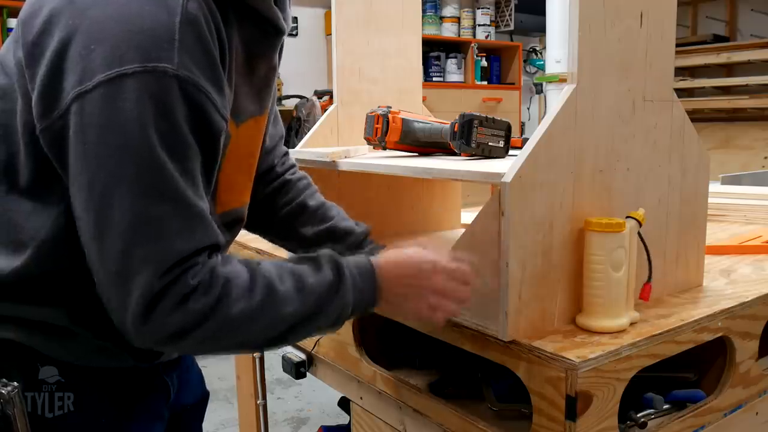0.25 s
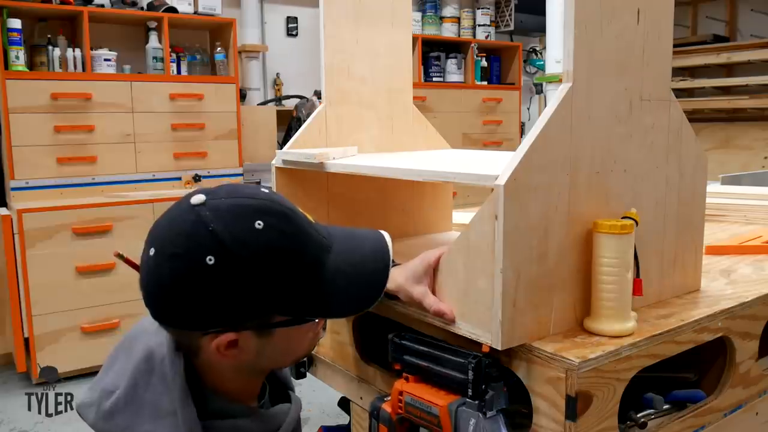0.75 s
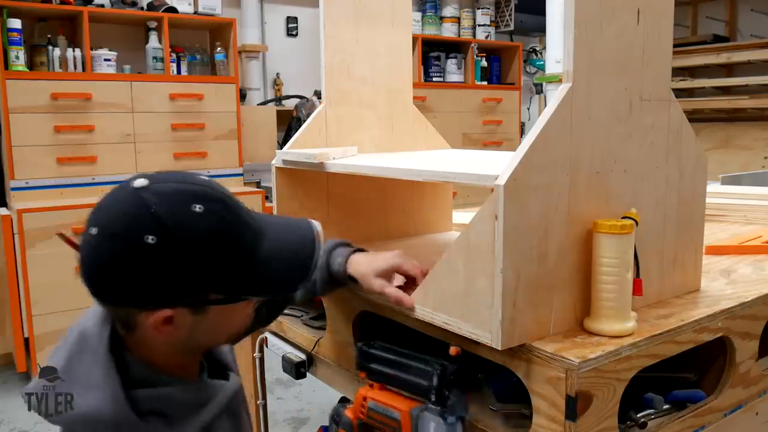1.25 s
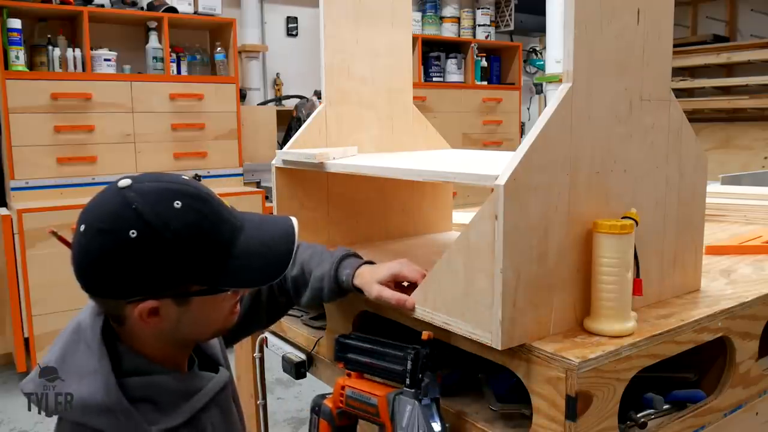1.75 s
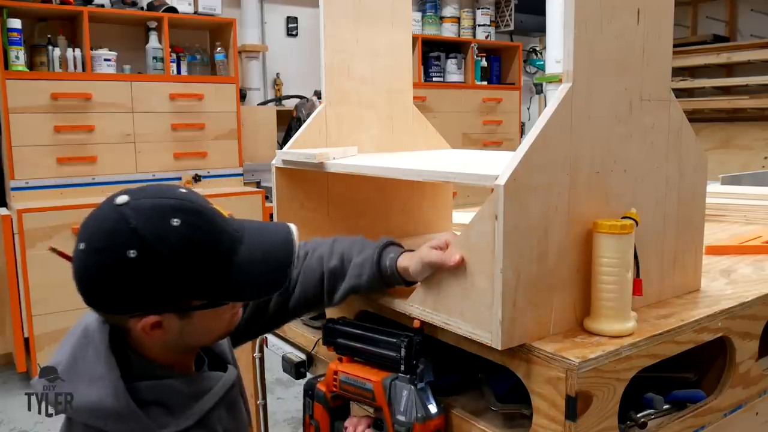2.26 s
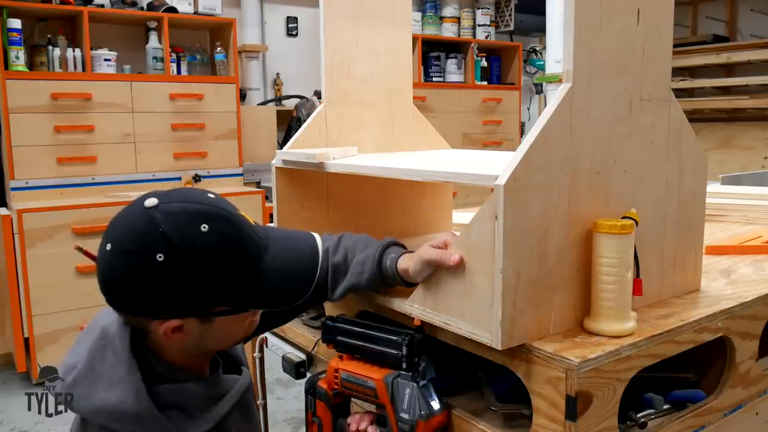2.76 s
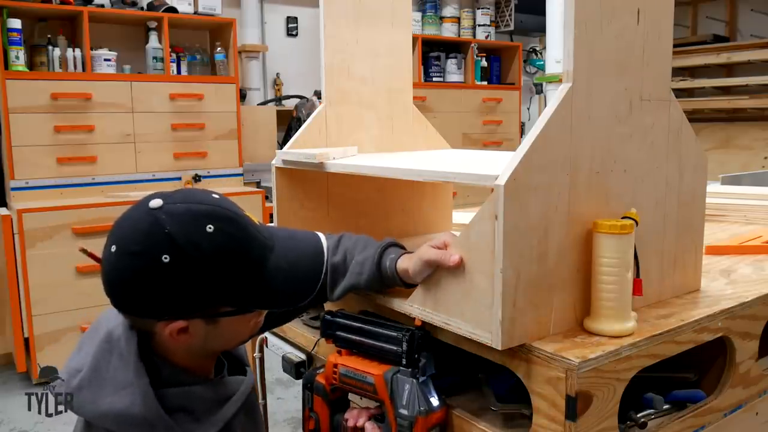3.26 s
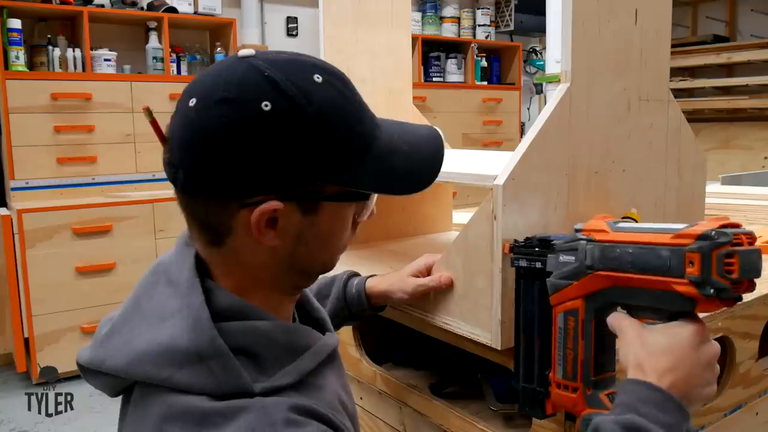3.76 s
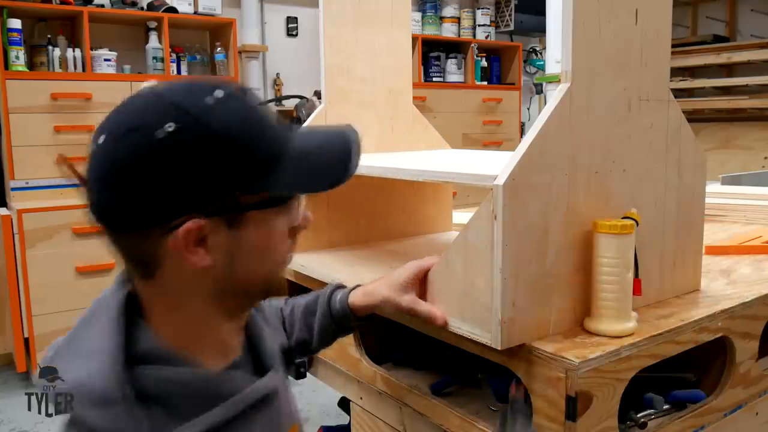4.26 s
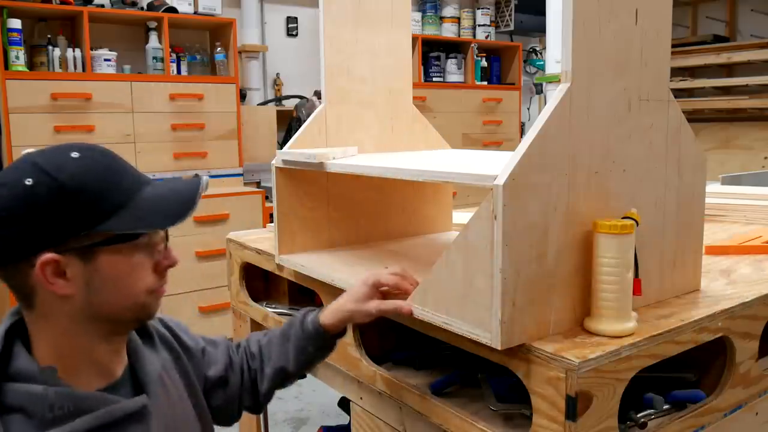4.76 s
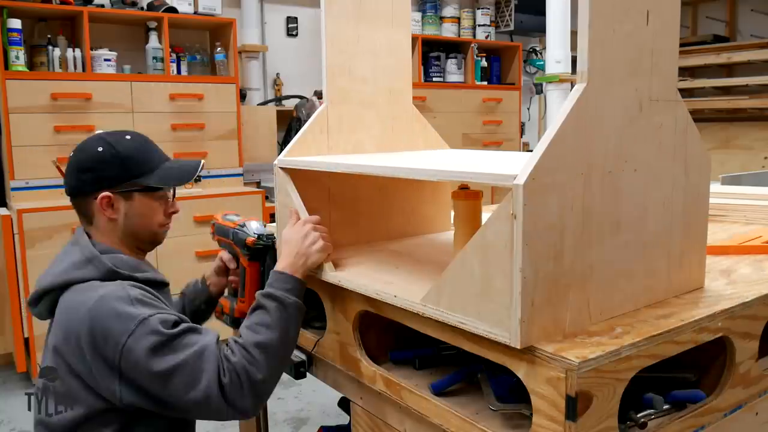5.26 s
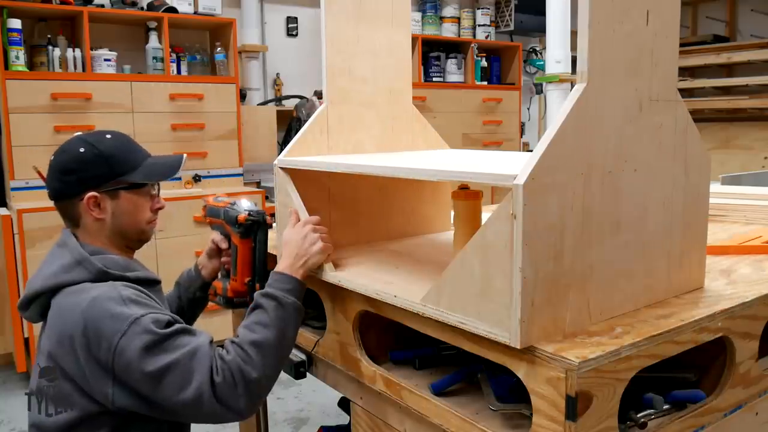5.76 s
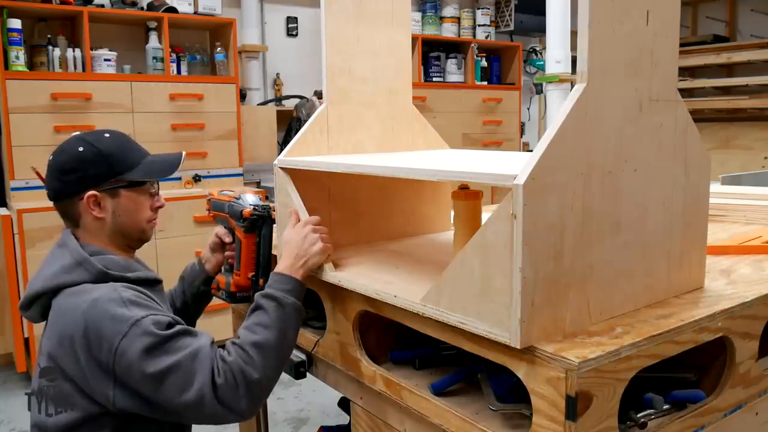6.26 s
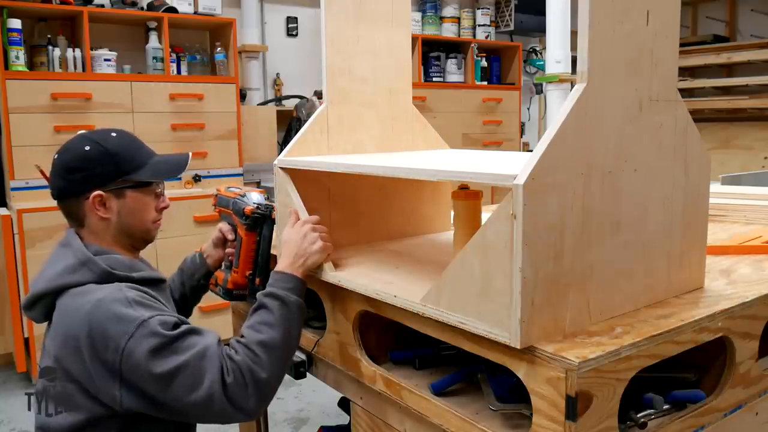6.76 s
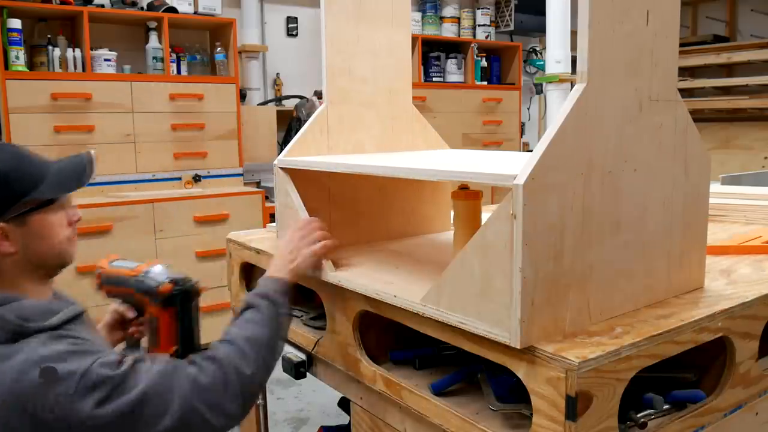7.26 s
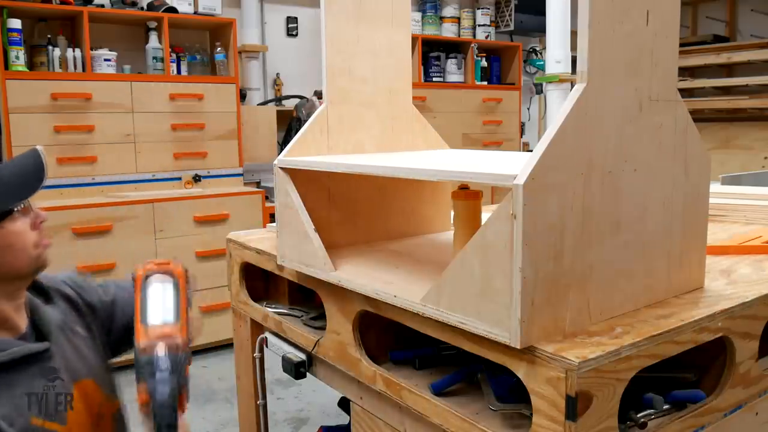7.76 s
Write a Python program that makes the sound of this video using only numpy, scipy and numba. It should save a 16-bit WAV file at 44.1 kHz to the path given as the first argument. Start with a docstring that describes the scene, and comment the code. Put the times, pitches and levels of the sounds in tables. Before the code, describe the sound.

Close by in a quiet workshop, a cordless nailer fires five times into plywood. Every shot starts with a quick, gritty motor whir, cracks with a hollow wooden thump, and ends in a brief mechanical clatter. The second and third shots come close together, the others further apart. Soft cloth rustle, dull bumps, small taps and tiny spring squeaks fill the gaps as the tool is moved, over faint room air.

```python
"""Battery nailer in a workshop

Five nails go into a plywood cabinet. Each time, a geared motor whines as it cocks the piston, the shot
booms through the wood and the room, and latches clack as the motor winds back. A limiter holds the boom
flat. Sleeves rustle and the tool's nose scrapes, taps and squeaks, over a faint hum and room air."""
import sys
import numpy as np
from scipy import signal
from scipy.fft import rfft, irfft
from scipy.io import wavfile
from scipy.ndimage import uniform_filter1d, minimum_filter1d
from numba import njit

SR = 44100
rng = np.random.default_rng(int(sys.argv[2]) if len(sys.argv) > 2 else 0)


def dump_mix(stems):
    """Bounce the given channels to the path in sys.argv[1] as a 16-bit WAV at rate SR."""
    frames = np.atleast_2d(stems).T  # one column per channel
    limited = np.clip(frames, -1, 1)  # hard clip at full scale
    pcm = np.round(limited * 32767).astype(np.int16)
    wavfile.write(sys.argv[1], SR, pcm)


N = 353682
T = np.arange(N) / SR


def undb(db):
    return 10 ** (np.asarray(db) / 20)


def level(x, db=0):
    """Set a sound's average (rms) level."""
    return x * undb(db) / np.sqrt(np.mean(x ** 2))


def colour(x, table):
    """Shape a sound's bass and treble with (frequency [Hz], level [dB]) points."""
    hz, db = np.transpose(table)
    f = np.maximum(np.fft.rfftfreq(x.shape[-1], 1 / SR), 1)
    return irfft(rfft(x) * undb(np.interp(np.log(f), np.log(hz), db)), x.shape[-1])


def wander(rate):
    """Glide to a new random value, roughly 1 in size, `rate` times a second."""
    k = int(SR / rate)
    return 1.4 * uniform_filter1d(np.repeat(rng.standard_normal(N // k + 1), k), k)[:N]


def add(out, s, x):
    """Mix x into out, starting at s seconds."""
    i = int(s * SR)
    out[i:i + len(x)] += x[:max(len(out) - i, 0)]


def fall(t, ring_s):
    """Die away by 60 dB in ring_s seconds: the "ring time" in the tables."""
    return 1000. ** (-t / np.maximum(ring_s, .005))


def burst(hz, ring_s, q, hold_s=0):
    """A puff of noise around one pitch that holds, then dies. Higher q sounds more like a note."""
    t = np.arange(SR // 4) / SR
    b, a = signal.iirpeak(np.clip(hz, 30, 9000), q, SR)
    x = rng.standard_normal(len(t)) * fall(np.maximum(t - hold_s, 0), ring_s) * np.minimum(t / .0015, 1)
    x = signal.lfilter(b, a, signal.lfilter(b, a, x))
    return x / np.abs(x).max()


def knock(hz, treble_db, ring_s, q, hold_s=0):
    """Two hard things meet: a main burst, a higher and a lower one, and a bright tick."""
    main = burst(hz, ring_s, q, hold_s)
    high = burst(1.7 * hz, .7 * ring_s, q, hold_s)
    low = burst(hz / 2.2, min(ring_s, .08), min(q, 2.2), hold_s)
    tick = burst(7500, min(.6 * ring_s, .04), .9, hold_s)
    return main + .4 * high + .4 * low + undb(treble_db) * tick


def stereo(middle, side):
    """Make left and right by adding and subtracting the side signal."""
    return middle + side * np.array([[1], [-1]])


# The tone of the room's air: (frequency [Hz], level [dB])
AIR_TONE = [(12, -41.5), (20, -3.5), (127, -8), (154, -16), (241, -7), (277, -11), (802, -21), (873, -20.5),
            (949, -21.5), (2200, -34.5), (3400, -36), (5500, -45), (12100, -46), (16000, -61)]
def air():
    """Soft, low room noise, nearly alike in both ears."""
    middle, side = colour(rng.standard_normal((2, N)), AIR_TONE)
    noise = stereo(middle, .05 * side + .6 * np.diff(side, prepend=0))
    return level(noise, -62) * undb(1.5 * wander(2.2))


# The notes of the hum: (pitch [Hz], average level [dB])
HUM_NOTES = [(123.8, -68), (861, -80.5)]
def hum(stop_s=5.2):
    """A faint hum that wavers, then stops."""
    notes = sum(np.sqrt(2) * undb(db + .5 * wander(1.3)) * np.sin(2 * np.pi * hz * T)
                for hz, db in HUM_NOTES)
    return notes * np.clip((stop_s - T) / .03, 0, 1)


# Sleeve and hand movements: (loudest at [s], level [dB], rise [s], fade [s], treble [dB])
SLEEVE_SWEEPS = [(0.461, -69, 0.086, 0.065, -19), (1.129, -50.5, 0.38, 0.5, -13),
                 (1.96, -62, 0.045, 0.15, -20.5), (2.13, -64.5, 0.24, 0.51, -10.5),
                 (2.839, -58.5, 0.037, 0.061, -31), (4.23, -45, 0.039, 0.28, -15.5),
                 (4.61, -53.5, 0.15, 0.44, -12), (5.23, -50.5, 0.14, 0.15, -23),
                 (5.88, -49, 0.13, 0.11, -14.5), (6.24, -61, .06, 0.12, -34),
                 (7.13, -50.5, 0.06, 0.41, -16), (7.32, -51.5, 0.047, 0.083, -18),
                 (7.55, -59, 0.032, 0.2, -14), (7.77, -62.5, 0.2, 0.083, -7), (8.02, -56.5, 0.21, .1, -15)]
# The tone of rubbing cloth: (frequency [Hz], level [dB])
CLOTH_TONE = [(88, -46.5), (150, -2), (179, 5.5), (448, 1.5), (854, 0), (3220, -6), (4410, -12.5),
              (14500, -55.5), (16000, -22)]
# The sizzle of fine rubbing, also used for the motor's brushes: (frequency [Hz], level [dB])
SIZZLE_TONE = [(2000, -35), (5000, 4.5), (7000, 1), (11000, -3), (15000, -10), (16500, -28.5)]
def rustle():
    """Cloth rubs in grainy sweeps that rise and fade by 20 dB in the listed times."""
    cloth_gain, sizzle_gain = undb(-101.5), undb(-124.5)  # cloth never quite rests
    for s, db, rise, fade, treble_db in SLEEVE_SWEEPS:
        sweep = undb(db - 20 * np.maximum((s - T) / rise, (T - s) / fade))
        cloth_gain += sweep
        sizzle_gain += undb(treble_db) * sweep
    grains = rng.standard_normal((2, N)) * undb(2 * wander(25) + 1.2 * wander(200))
    cloth = level(colour(grains[0], CLOTH_TONE))
    sizzle = level(colour(grains[1], SIZZLE_TONE))
    return cloth_gain * cloth + sizzle_gain * sizzle


# Clacks of the trigger and the starting motor: (time [s], level [dB], pitch [Hz], ring time [s])
TRIGGER_CLACKS = [(0.549, -38.5, 3700, 0.047), (0.56, -35, 2820, 0.064), (.579, -13, 1880, 0.03),
                  (3.047, -40.5, 3900, 0.12), (3.063, -29, 1330, 0.021), (3.078, -10, 1404, 0.2),
                  (3.699, -23, 1250, 0.047), (3.723, -11.5, 1320, 0.044), (6.57, -23.5, 1490, 0.046),
                  (6.591, -21.5, 1120, 0.035)]
def trigger_clacks():
    """The trigger and motor clack. Higher clacks tick harder; longer ones have a clearer pitch."""
    out = np.zeros(N)
    for s, db, hz, ring_s in TRIGGER_CLACKS:
        treble_db = -26.5 + 14.5 * np.log2(hz / 1000)
        add(out, s, undb(db) * knock(hz, treble_db, ring_s, q=34 * ring_s))
    return out


# One row per nail: (motor start [s], shot [s], brush hiss [dB], cocking [dB], winding back [dB],
# shot level [dB], extra bass [dB], extra blade ring [dB], extra low-middle tones [dB])
NAILS = [(0.577, 0.776, -8.5, -36.5, -37, -13, 4.5, 2, 0.5),
         (3.073, 3.273, -13, -34.5, -27.5, -8.5, 1.5, 1, -1),
         (3.72, 3.918, -15.5, -33, -30, -3, -15, -4.5, 1.5),
         (5.303, 5.447, -18, -36.5, -27.5, -1, -9.5, -5, -4.5),
         (6.567, 6.791, -22.5, -36.5, -24.5, -9.5, -14, -3, 3.5)]
# Each nail's blow; a "lead" is time before the shot: (motor dip lead [s], motor dip [dB], snap [dB],
# hiss and tick [dB], jolt lead [s], jolt [dB], hiss lead [s], shudder [dB],
# plywood ring time [factor], blade ring time [factor])
BLOWS = [(0.0084, -12.5, 2.5, 2.5, 0.009, -9.5, .001, -15, 0.78, 0.82),
         (0.014, -3, 6.5, 3.5, 0.011, -16, .001, -13, 0.87, 0.63),
         (0.015, -22, 6.5, -10, 0.0043, -5, .001, -19, 0.99, 0.56),
         (0.016, -12, 8.5, 3, 0.0052, -4.5, .004, -16, 1, 0.69),
         (0.0036, 0, 8, 0.5, 0.005, -11, 0.0053, -13.5, 0.97, 0.74)]
# Each nail's whine: (five columns of boost for harmonics 1-5 [dB], housing ring [dB], speed [factor])
WHINES = [(4, 1, 3.3, 2, -2.5, -8, 1.01), (3, -5, 2.3, -3.5, 4.5, -15.5, 1.0),
          (0.5, 0.5, 3, -8.5, 3.5, -19, 0.99), (9, -1.5, 6, -5, -3, -7.5, 0.99),
          (-2, -2, 3, -3, 1, -9, 0.99)]
# The gears slow as the load builds towards the shot: (time from the shot [s], base pitch [Hz])
GEAR_PITCH = [(-.21, 1277), (-.14, 1226), (-.07, 1199), (0, 1173), (.1, 1215)]
def motor_drive(run_on_s=.243):
    """The motor's pitch and levels over time: it cocks the piston, lets go, winds back and stops."""
    hz = np.full(N, 1200.)
    gain, load, hiss, housing = np.zeros((4, N))
    boosts_db = np.zeros((len(GEAR_HARMONICS), N))
    for nail, whine, (lead, dip_db, *_) in zip(NAILS, WHINES, BLOWS):
        start, shot, hiss_db, cock_db, back_db, *_ = nail
        *harmonics_db, housing_db, speed = whine
        stop = shot + run_on_s
        on = (T >= start) & (T < stop + .1)
        loudness = [(start, cock_db - 9), (start + .0073, cock_db), (shot - lead - .004, cock_db),
                    (shot - lead, cock_db + dip_db), (shot, cock_db + dip_db),
                    (shot + .0045, back_db), (stop, back_db - 12.5), (stop + .014, -70)]
        gain[on] = undb(np.interp(T[on], *np.transpose(loudness)))
        hz[on] = speed * np.interp(T[on] - shot, *np.transpose(GEAR_PITCH))
        load[on] = np.where(T[on] < shot, 1, .25)
        hiss[on], housing[on] = undb(hiss_db), undb(housing_db)
        boosts_db[:len(harmonics_db), on] = np.array(harmonics_db)[:, None]
    return hz, gain, load, hiss, housing, boosts_db


# The notes that make up the whine: (multiple of the gear pitch [factor], level [dB])
GEAR_HARMONICS = [(1, -19), (2, 3), (3, -11.5), (4, -1.5), (5, -11.5), (6, -12.5), (7, -15.5), (8, -18.5),
                  (9, -23.5)]
# The tone of grinding gears: (frequency [Hz], level [dB])
GRIND_TONE = [(35, -22), (60, -9.5), (156, 5), (448, -6), (946, -1.5), (1140, -0.5), (1220, 4.5),
              (1700, -2.5), (2470, -4.5), (3040, -1.5), (3500, -3.5), (3850, -4.5), (10500, -32),
              (14900, -37), (16000, -47.5)]
def motor(teeth_per_turn=10.4, housing_hz=3468, housing_width_hz=140):
    """Gears whine and grind and brushes hiss, throbbing once a turn. Tooth ticks ring the housing."""
    hz, gain, load, hiss, housing, boosts_db = motor_drive()
    phase = 2 * np.pi * np.cumsum(hz * (1 + .007 * wander(200))) / SR
    turn = np.sin(phase / teeth_per_turn)
    notes = sum(undb(db + boost_db + 3.5 * wander(200)) * np.sin(k * phase)
                for (k, db), boost_db in zip(GEAR_HARMONICS, boosts_db))
    whine = undb(-9.5) * notes * (1 + .4 * turn)
    throb = 1 + .18 * turn
    grit = undb(1.5 * wander(600))
    grind = colour(rng.standard_normal(N) * grit, GRIND_TONE) * throb
    # one tick of random strength each time two teeth meet
    teeth = np.diff(phase // (2 * np.pi), prepend=0) * undb(5.5 * rng.standard_normal(N))
    brushes = colour(rng.standard_normal(N) * grit + level(teeth, -12), SIZZLE_TONE) * throb
    resonance = signal.iirpeak(housing_hz, housing_hz / housing_width_hz, SR)
    ring = signal.lfilter(*resonance, teeth * rng.standard_normal(N))
    return gain * (level(grind) + housing * level(ring) + load * whine + hiss * level(brushes))


def bench_jolts():
    """A jolt runs through the bench just ahead of each shot: a dip, then a slower swing back."""
    out = np.zeros(N)
    for (_, s, _, _, _, db, *_), (_, _, _, _, lead, jolt_db, *_) in zip(NAILS, BLOWS):
        add(out, s - lead, -undb(db + jolt_db) * np.hanning(int(.0039 * SR)))
        add(out, s - lead + .0027, undb(db + jolt_db - 2.5) * np.hanning(int(.0091 * SR)))
    return out


def nose_snaps():
    """The release hisses, then the tool's nose ticks and snaps, chattering for a moment."""
    out = np.zeros(N)
    for (_, s, _, _, _, db, *_), (_, _, snap_db, tick_db, _, _, lead, *_) in zip(NAILS, BLOWS):
        add(out, s - lead, undb(db + tick_db - 7) * burst(4100, ring_s=.08, q=.5))
        add(out, s - .001, undb(db + tick_db - 7.5) * burst(7000, ring_s=.035, q=.34, hold_s=.008))
        add(out, s - .001, undb(db + snap_db) * burst(1200, ring_s=.031, q=.4, hold_s=.008))
    return out


def low_boost(hz, bass_db, mid_db):
    """Pick the extra level for a bass or low-middle pitch."""
    return bass_db if hz < 450 else mid_db if hz < 950 else 0


# The cabinet's natural notes: (pitch [Hz], level [dB], ring time [s])
PLYWOOD_NOTES = [(90, -11.5, 0.17), (153.7, -22, 0.9), (210, 1, 0.079), (300.5, -6, 0.25),
                 (379, -10.5, 0.4), (551, 1.5, 0.055), (603, -7.5, 0.14), (728, 0, 0.064), (906, 3, 0.027),
                 (1038, 0, 0.018), (1290, -10, 0.16), (1490, -12.5, 0.43), (2400, -18.5, 0.078),
                 (3080, -13.5, 0.074)]
def plywood_ring(t, stretch, bass_db, mid_db):
    """Struck plywood rings at many pitches at once, a little differently on each blow."""
    ring = 0
    for hz, db, ring_s in PLYWOOD_NOTES:
        gain = undb(db + 2 * rng.standard_normal() + low_boost(hz, bass_db, mid_db))
        pitch = hz * (1 + .023 * rng.standard_normal())
        ring += gain * np.sin(2 * np.pi * pitch * t) * fall(t, ring_s * stretch)
    return ring * np.minimum(t / .0021, 1)


# The notes of the steel blade that drives the nail: (pitch [Hz], ring time [s])
BLADE_NOTES = [(1940, 0.082), (2010, 0.1)]
def blade_ring(t, stretch):
    """The blade rings and rattles in its guide, so its level and pitch wobble."""
    ring = 0
    for hz, ring_s in BLADE_NOTES:
        gain = undb(4.5 * wander(150)[:len(t)]) * fall(t, ring_s * stretch)
        pitch = hz * (1 + .012 * wander(214)[:len(t)])
        ring += gain * np.sin(2 * np.pi * np.cumsum(pitch) / SR)
    return ring


# The tone of the shot's crack: (frequency [Hz], level [dB])
CRACK_TONE = [(47, -37), (80, 1), (493, 2), (538, 1), (1000, -4), (1990, -6.5), (2330, -15), (3470, -16.5),
              (9400, -45.5), (16000, -63)]
def shots():
    """Each blow cracks through the air and rings wood and blade; the winding motor shakes the wood."""
    out, t = np.zeros(N), np.arange(SR // 2) / SR
    shudder = np.interp(t, [.02, .04, .105, .115], [0, 1, 1, 0])
    for nail, (*_, shudder_db, wood_stretch, blade_stretch) in zip(NAILS, BLOWS):
        _, s, _, _, _, db, bass_db, blade_db, mid_db = nail
        ring = plywood_ring(t, wood_stretch, bass_db, mid_db)
        ring += undb(blade_db + 1.5) * blade_ring(t, blade_stretch)
        tone = [(hz, tone_db + low_boost(hz, bass_db, mid_db)) for hz, tone_db in CRACK_TONE]
        noise = level(colour(rng.standard_normal(len(t)), tone), 1)
        crack = noise * (fall(t, .057) + undb(shudder_db) * shudder)
        add(out, s, undb(db) * (undb(-4.5) * ring + crack))
    return out


# Clacks after each shot: (time [s], level [dB], pitch [Hz], treble [dB], ring time [s])
LATCH_CLACKS = [(0.809, -31, 1100, -15, 0.027), (.9055, -12.5, 3040, -8.5, 0.047),
                (0.961, -15, 1510, -15.5, 0.054), (1.0, -15.5, 2210, -20, 0.06),
                (3.331, -19, 1880, -23, 0.076), (3.3677, -10.5, 1997, -25, 0.048),
                (3.403, -14, 2830, -8, 0.071), (3.459, -18, 1540, -14.5, 0.075),
                (3.4967, -20, 2800, -19, 0.055), (3.9487, -28, 1320, -16, .04),
                (4.0547, -10.5, 2560, -11.5, 0.02), (4.068, -24, 1490, -12, 0.033),
                (4.1075, -21, 2370, -16, 0.04), (4.146, -11, 1970, -23, 0.064),
                (5.5086, -10, 1180, -18, 0.058), (5.586, -10.5, 3830, -15, 0.033),
                (5.638, -17, 2240, -15, 0.046), (5.6789, -18, 2540, -16.5, 0.032),
                (5.732, -35.5, 1480, -17, 0.037), (6.8257, -11.5, 2150, -22, 0.052),
                (6.9225, -16, 3527, -16, 0.043), (6.9464, -23, 2000, -22, 0.055),
                (6.985, -21, 1745, -16, 0.037), (7.0196, -23, 1980, -16.5, 0.063)]
def latches():
    """The piston bounces, then latches catch and chatter as it winds back."""
    out = np.zeros(N)
    for s, db, hz, treble_db, ring_s in LATCH_CLACKS:
        add(out, s, undb(db) * knock(hz, treble_db, ring_s, q=2.2, hold_s=.13 * ring_s))
    return out


# Ticks of a loose part: (time [s], level [dB], pitch [Hz])
LOOSE_TICKS = [(1.1515, -30, 2220), (1.1559, -30.5, 2280)]
def loose_part():
    """A loose part of the tool ticks twice."""
    out = np.zeros(N)
    for s, db, hz in LOOSE_TICKS:
        add(out, s, undb(db) * burst(hz, ring_s=.013, q=2))
    return out


# Short slides of the nose: (time [s], length [s], level [dB], pitch [Hz])
NOSE_SCRAPES = [(1.168, 0.072, -48.5, 3260), (1.299, 0.032, -49, 2980), (1.298, .04, -53, 1880),
                (1.44, 0.037, -56.5, 3070)]
def scrapes():
    """The nose scrapes over the plywood in short, held bursts of noise."""
    out = np.zeros(N)
    for s, length, db, hz in NOSE_SCRAPES:
        add(out, s, undb(db) * burst(hz, ring_s=.068, q=3.5, hold_s=length))
    return out


# Light taps on the wood: (time [s], level [dB], pitch [Hz], treble [dB])
WOOD_TAPS = [(1.943, -66, 955, 5), (2.817, -49.5, 1010, -18), (2.975, -28, 1550, -36),
             (3.665, -45, 1150, -13), (4.341, -41.5, 1370, -9), (4.997, -53, 1315, -54),
             (5.876, -42.5, 1060, -25), (5.898, -42, 1030, -20), (6.169, -41, 1350, -28),
             (6.172, -50, 3200, -25), (2.996, -46.5, 4500, 0), (7.523, -40, 3300, -17),
             (6.211, -44.5, 1286, -33), (7.29, -43, 1410, -29), (7.317, -39, 1000, -23),
             (7.524, -43, 1230, -9), (7.539, -41.5, 1450, -21), (7.934, -50, 1310, -21),
             (7.984, -48, 3030, -24)]
def taps():
    """The nose and fingers tap the plywood."""
    out = np.zeros(N)
    for s, db, hz, treble_db in WOOD_TAPS:
        add(out, s, undb(db) * knock(hz, treble_db, ring_s=.07, q=1.8))
    return out


# Bumps on the cabinet: (time [s], level [dB], pitch [Hz])
CABINET_BUMPS = [(2.124, -46, 615), (2.149, -47, 560), (2.603, -45.5, 152), (2.817, -40, 159),
                 (2.86, -47, 176), (2.975, -28.5, 145), (3.01, -29, 170), (5.193, -43.5, 99),
                 (5.234, -35.5, 150), (5.26, -38, 176), (6.16, -43, 547), (6.19, -45, 245),
                 (7.959, -46.5, 40.4)]
def bumps():
    """The bumped cabinet gives a dull thud with no tick on top."""
    out = np.zeros(N)
    for s, db, hz in CABINET_BUMPS:
        add(out, s, undb(db) * burst(hz, ring_s=.19, q=1.2))
    return out


# Squeaks of the spring: (time [s], length [s], pitch [Hz], level [dB], octave above [dB])
SPRING_SQUEAKS = [(2.952, .015, 3080, -40, -14), (3.632, .013, 2420, -34, -30),
                  (6.546, .026, 3540, -39, -14), (6.513, .035, 1950, -61, -30), (4.55, .08, 3280, -56, -30)]
def squeaks():
    """The spring in the nose squeaks: a scratchy note that swells and fades as its pitch sags."""
    out = np.zeros(N)
    for s, length, hz, db, octave_db in SPRING_SQUEAKS:
        t = np.arange(int(length * SR)) / SR
        scratch = .055 * np.cumsum(rng.standard_normal(len(t)))
        phase = 2 * np.pi * hz * (t - .03 * t ** 2 / length) + scratch
        swell = np.sin(np.pi * t / length) ** 2
        add(out, s, undb(db) * swell * (np.sin(phase) + undb(octave_db) * np.sin(2 * phase)))
    return out


# How long the workshop echoes: (frequency [Hz], ring time [s])
ROOM_RING = [(100, 0.29), (400, 0.41), (1500, 0.5), (5000, 0.4), (12000, 0.22)]
def room(x, cut_s=3.646):
    """The echo dies at its own rate in each band. Whatever is still echoing at cut_s stops short."""
    t = np.arange(SR) / SR
    room_hz, room_s = np.transpose(ROOM_RING)
    tail = 0
    for hz in 64 * 2 ** np.arange(0, 8.1, .5):
        band = signal.butter(2, [hz / 2 ** .25, hz * 2 ** .25], "band", fs=SR, output="sos")
        ring_s = np.interp(np.log(hz), np.log(room_hz), room_s)
        tail += signal.sosfilt(band, rng.standard_normal((2, SR))) * fall(t, ring_s)
    tail *= np.clip((t - .008) / .0013, 0, 1) / np.sqrt(np.sum(tail[0] ** 2))  # starts 8 ms late
    side = undb(-32) * (tail[1] + 2.7 * np.diff(tail[1], prepend=0))
    echo = stereo(tail[0], side)
    early, late = (signal.fftconvolve((x * part)[None], echo, axes=1)[:, :N]
                   for part in (T < cut_s, T >= cut_s))
    return early * np.clip((cut_s - T) / .0013, 0, 1) + late


def scene():
    """Mix the nailer, the handling sounds, their echo and the background."""
    whine, boom = motor(), shots()
    clatter = trigger_clacks() + latches() + taps() + loose_part() + scrapes() + bumps() + squeaks()
    small_sounds = clatter + rustle()
    # the cabinet throws the boom all round the shop; small sounds aim more at the microphone
    echo = room(undb(-2.5) * whine + undb(-4.5) * boom + undb(-11.5) * small_sounds)
    return whine + boom + bench_jolts() + nose_snaps() + small_sounds + echo + air() + hum()


def microphone(x, hz=3440, width_hz=300, lift_db=2.5):
    """The microphone lifts one treble band."""
    return x + (undb(lift_db) - 1) * signal.lfilter(*signal.iirpeak(hz, hz / width_hz, SR), x)


def widen(x):
    """A faint, scattered difference between left and right gives slight stereo width."""
    t = np.arange(SR // 10) / SR
    scatter = rng.standard_normal(len(t)) * fall(t, .1)
    scatter /= np.sqrt(np.sum(scatter ** 2))
    side = signal.fftconvolve(x.mean(0), scatter + 1.9 * np.diff(scatter, prepend=0))[:N]
    return stereo(x, undb(-30) * side)


@njit
def recover(gain, step):
    """Let the gain drop at once, but climb back only by the factor `step` each sample."""
    out, g = np.empty(len(gain)), 1.
    for i in range(len(gain)):
        g = min(gain[i], g * step)
        out[i] = g
    return out


def limiter(x, ceiling_db=-16.6, ahead_s=.0022, recover_db_per_s=650):
    """Turn the volume down just before each loud peak, then quickly back up."""
    ahead = int(ahead_s * SR)
    needed = np.minimum(1, undb(ceiling_db) / (np.abs(x).max(0) + 1e-9))
    gain = recover(minimum_filter1d(needed, 2 * ahead + 1), undb(recover_db_per_s / SR))
    return x * uniform_filter1d(gain, ahead)


def record(dry, top_hz=15800):
    """Pick up the sound, widen it, limit its peaks and cut the highest treble."""
    treble_cut = signal.ellip(10, .2, 85, top_hz, fs=SR, output="sos")
    return signal.sosfilt(treble_cut, limiter(widen(microphone(dry))))


dry = scene()
out = record(dry)
dump_mix(out)
```